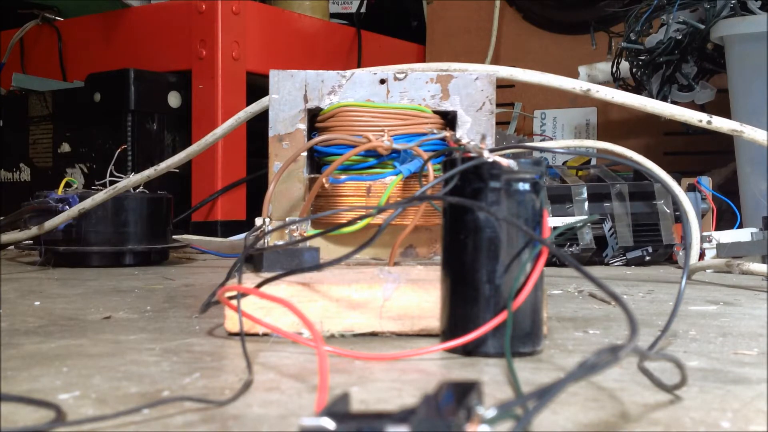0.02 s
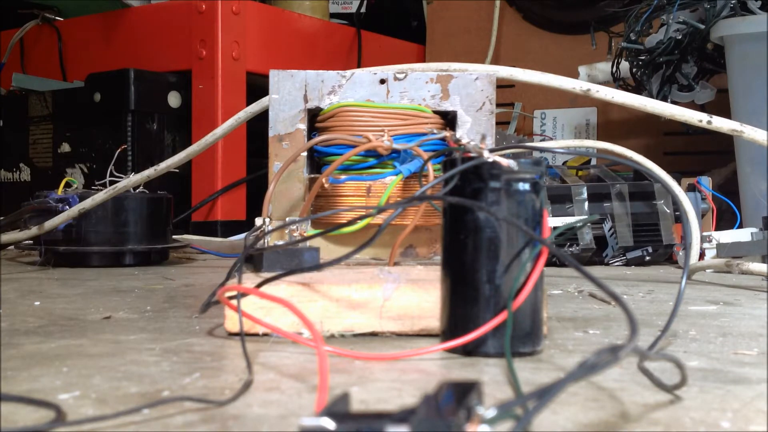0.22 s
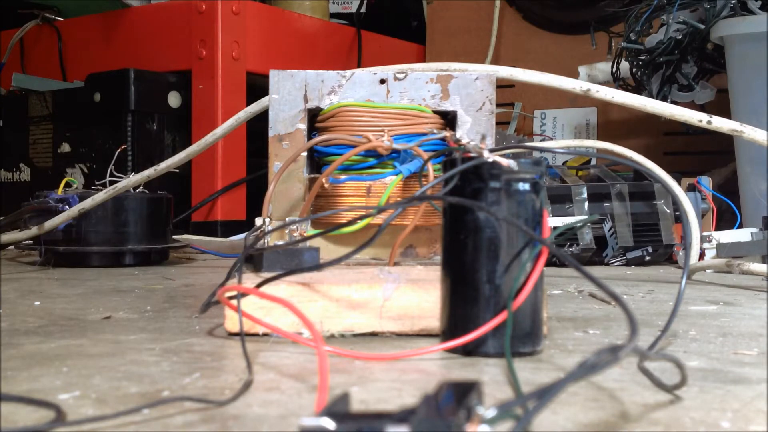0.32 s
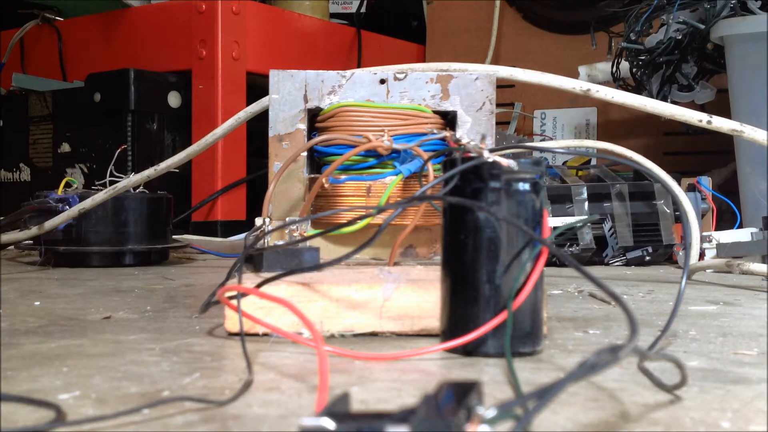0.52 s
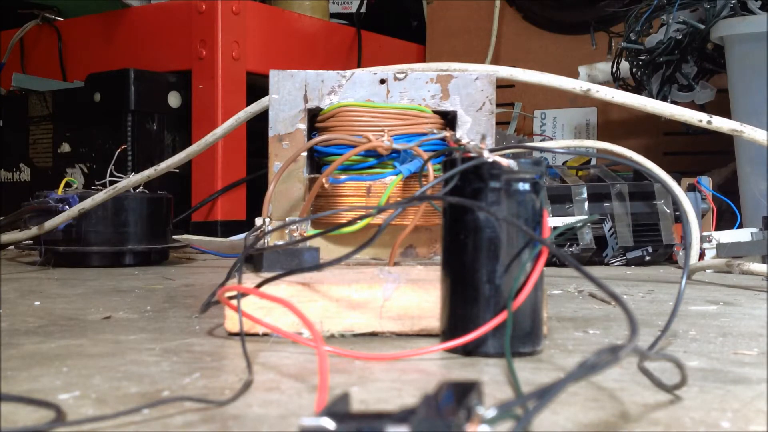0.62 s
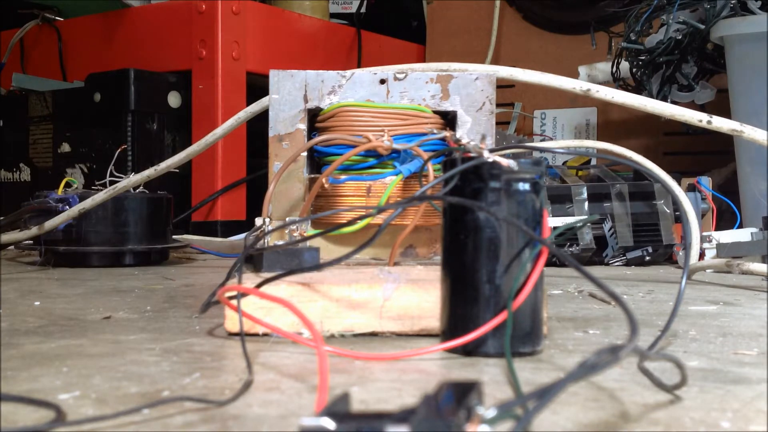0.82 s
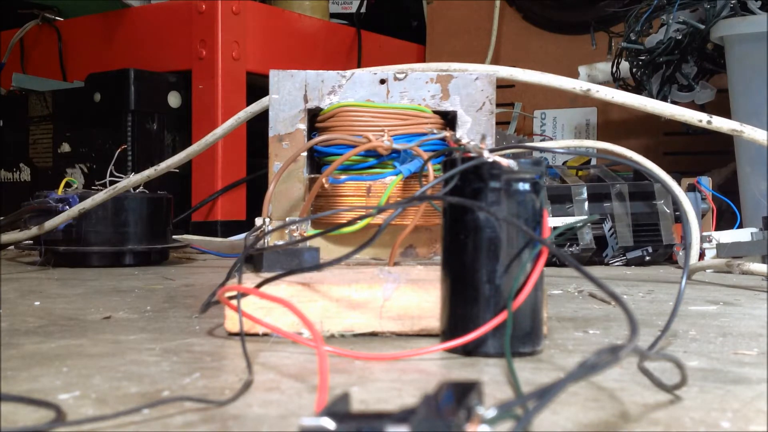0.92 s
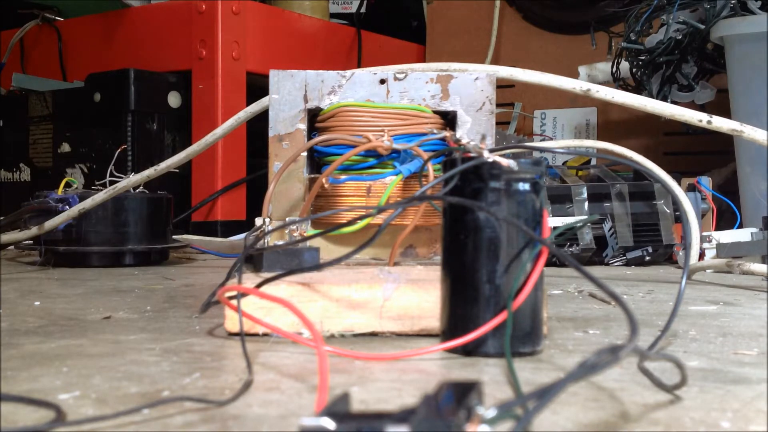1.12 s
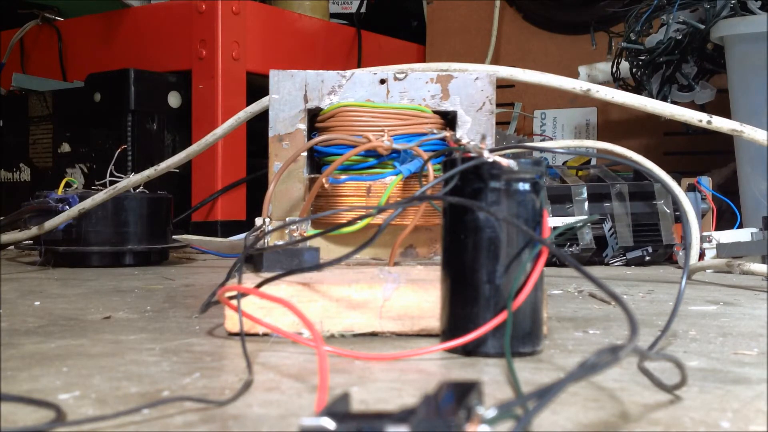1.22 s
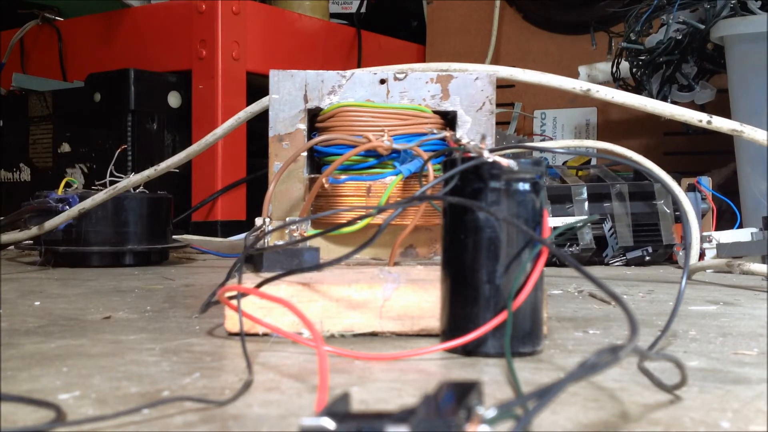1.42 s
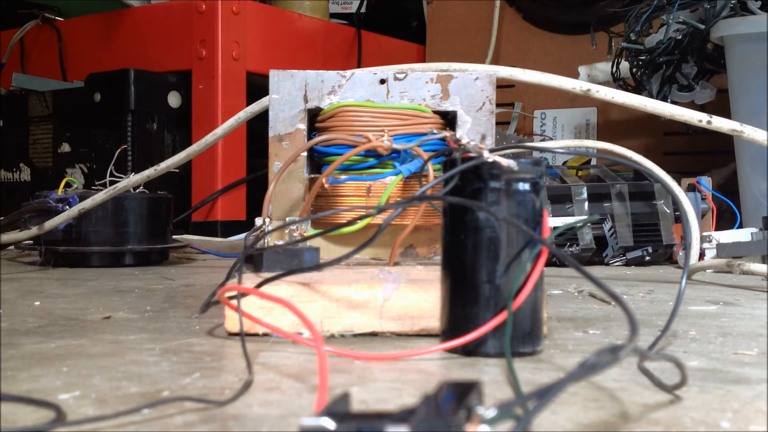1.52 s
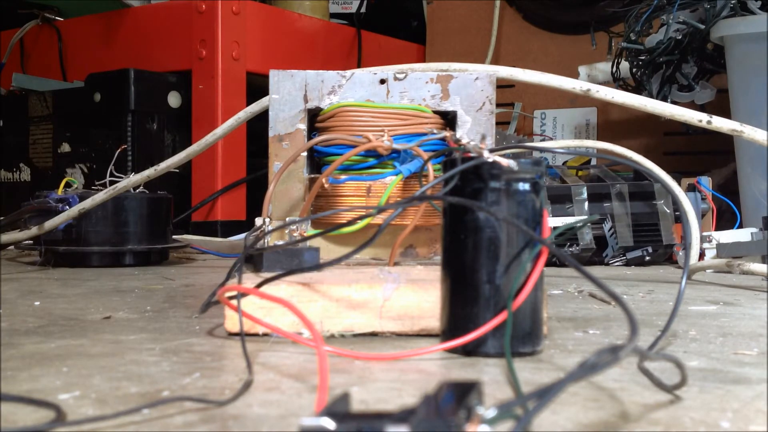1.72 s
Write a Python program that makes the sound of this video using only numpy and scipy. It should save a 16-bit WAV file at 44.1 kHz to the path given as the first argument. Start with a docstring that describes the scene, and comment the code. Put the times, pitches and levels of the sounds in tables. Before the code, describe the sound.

Electric sparks snap sharply in two ragged, crackling bursts over a very faint workshop hum

```python
"""High-voltage coil snapping in a workshop

A home-built coil snaps in two ragged bursts, each announced by faint ticks. Every discharge is a click that
rings broad resonances and leaves a short crackle; the room answers with a bright tail of dying noise.
Below: banded room noise, a wavering hum and thin whine of resonated noise, and faint far sine whistles,
perhaps a bird."""
import sys
import numpy as np
from scipy import signal
from scipy.io import wavfile

SR = 44100
rng = np.random.default_rng(int(sys.argv[2]) if len(sys.argv) > 2 else 0)


def to_wav(s):
    """Save 16-bit WAV."""
    ch = np.atleast_2d(s).T  # columns
    pcm = np.round(np.clip(ch, -1, 1) * 32767)  # PCM
    wavfile.write(sys.argv[1], SR, pcm.astype(np.int16))


N = 77175


def amp(db):
    """Amplitude ratio of a level in dB."""
    return 10 ** (np.asarray(db) / 20)


def rms_one(x):
    """Scale to unit RMS."""
    return x / np.sqrt(np.mean(x ** 2) + 1e-20)


def resonance(x, hz, pole_width_hz):
    """Two-pole peak of about unit gain, applied twice for dark valleys."""
    r = np.exp(-np.pi * pole_width_hz / SR)
    numerator = [(1 - r * r) / 2, 0, (r * r - 1) / 2]
    denominator = [1, -2 * r * np.cos(2 * np.pi * hz / SR), r * r]
    stage = numerator + denominator
    return signal.sosfilt([stage, stage], x + 1e-18)


def bandpass(x, low_hz, high_hz):
    """Butterworth band."""
    return signal.sosfilt(signal.butter(2, [low_hz, high_hz], "band", fs=SR, output="sos"), x)


def drift(pole_hz):
    """Slow random wander: noise through two equal low-pass poles, unit RMS."""
    r = np.exp(-2 * np.pi * pole_hz / SR)
    noise = rng.standard_normal(N + SR)
    settled = signal.lfilter([1], [1, -2 * r, r * r], noise)[SR:]
    return rms_one(settled)


# room noise spectrum: f/Hz, relative density/dB per Hz
NOISE_SPECTRUM = [(18, -72), (30, -43), (101, -22), (195, 0), (339, -18), (387, -7.5), (655, -11.5),
                  (1690, -17), (2390, -21.5), (3640, -23), (9900, -29.5), (14700, -26.5), (16300, -43)]
# room noise RMS: t/s, level/dB
NOISE_LEVEL = [(0, -70), (.035, -71.5), (0.199, -67.5), (.45, -72.5), (0.749, -68), (1.019, -72.5),
               (1.3, -70), (1.75, -67)]
# wavering tones: f/Hz, pole width/Hz, mean level/dB
HUM_TONES = [(195.3, 8.6, -78), (395, 44, -83.5), (1628, 25, -87)]
FLICKER_DB = 1


def background():
    """Half-octave noise bands, each flickering a little, plus hum and whine as narrowly resonated noise."""
    edges_hz = 30 * 2 ** np.arange(0, 9.6, .5)
    spectrum_hz, spectrum_db = np.transpose(NOISE_SPECTRUM)
    white = rng.standard_normal((2, N))  # neighbouring bands use different noise
    shared_drift = drift(6)
    noise = 0
    for k, (low, high) in enumerate(zip(edges_hz, edges_hz[1:])):
        band_db = np.interp(np.log(low * high) / 2, np.log(spectrum_hz), spectrum_db)
        flicker_db = FLICKER_DB * (0.2 * shared_drift + drift(4.3))
        noise = noise + bandpass(white[k % 2], low, high) * amp(band_db + flicker_db)
    t, level_db = np.transpose(NOISE_LEVEL)
    level_db = np.interp(np.arange(N) / SR, t, level_db)
    hum = sum(amp(db) * rms_one(resonance(rng.standard_normal(N), hz, width))
              for hz, width, db in HUM_TONES)
    return amp(level_db) * rms_one(noise) + amp(level_db - level_db.mean()) * hum


STRENGTH_SPREAD_DB = 2.5  # standard deviation, click to click
CLICK_LEAD_S = 0.0002  # clicks start this much before the listed times


def discharge_rings(at, level_db, polarity, group, crackle_db, crackle_t60_s):
    """Each click and its decaying noise crackle excite a group of resonances."""
    luck = rng.standard_normal((len(at), 5))
    clicks, out = np.zeros(N), np.zeros(N)
    for k, (hz, width, ring_db) in enumerate(group):
        clicks[at] = amp(level_db + ring_db + STRENGTH_SPREAD_DB * luck[:, k])
        glow = signal.lfilter([1], [1, -amp(-60 / crackle_t60_s / SR)], clicks)
        crackle = amp(crackle_db) * glow * rng.standard_normal(N)
        clicks[at] *= polarity
        out += resonance(clicks + crackle, hz, width)
    return out


def dying_noise(t60_s):
    """Half a second of noise falling 60 dB per t60."""
    t = np.arange(SR // 2) / SR
    return rng.standard_normal(len(t)) * amp(-60 * t / t60_s)


ROOM_RISE_S = 0.0013  # time constant


def room_answer(clicks, low_hz, high_hz, near_db, near_t60_s, far_db, far_t60_s):
    """Clicks convolved with band-limited noise that rises fast and dies at two rates."""
    rise = 1 - np.exp(-np.arange(SR // 2) / SR / ROOM_RISE_S)
    tail = rise * (amp(near_db) * dying_noise(near_t60_s) + amp(far_db) * dying_noise(far_t60_s))
    return signal.fftconvolve(clicks, bandpass(tail, low_hz, high_hz))[:N]


def discharge(t, level_db, polarity, group, crackle, room):
    """One resonance group over all its discharges: rings, crackle and room answer."""
    group_db, crackle_db, crackle_t60_s = crackle
    at = ((t - CLICK_LEAD_S) * SR).astype(int)
    impulse = np.eye(1, 2048)[0]
    response = sum(amp(db) * resonance(impulse, hz, width) for hz, width, db in group)
    scale = amp(group_db) / np.abs(response).max()  # so listed levels are nominal ring peaks
    rings = discharge_rings(at, level_db, polarity, group, crackle_db, crackle_t60_s)
    clicks = np.zeros(N)
    clicks[at] = amp(level_db) * polarity
    return scale * (rings + room_answer(clicks, *room))


# discharges: t/s, then nominal peak level/dB of sizzle, snap, knock
SPARK_CLICKS = [(0.1536, -50, -56, -58), (0.1781, -64, -60, -59), (0.1922, -61, -66, -64),
                (0.2193, -23, -29, -45), (0.2214, -12, -18, -34), (0.2219, -17, -29, -41),
                (0.2226, -10, -35, -43), (0.2256, -23, -33, -23), (0.2266, -27, -19, -30),
                (0.2281, -19, -20, -39), (0.2299, -20, -29, -40), (0.2312, -30, -26, -43),
                (0.2341, -17, -28, -46), (0.2358, -1, -10, -28), (0.2366, -5, -22, -33),
                (0.2371, -7, -24, -37), (0.2387, -14, -22, -49), (0.2393, -17, -30, -37),
                (0.3176, -23, -26, -42), (0.3189, -9, -17, -31), (0.3197, -24, -27, -41),
                (0.3204, -19, -31, -42), (0.3225, -18, -29, -48), (0.3312, -44, -44, -52),
                (0.7128, -49, -55, -56), (0.7395, -70, -58, -57), (0.7965, -22, -38, -36),
                (0.7973, -29, -27, -15), (0.8024, -29, -22, -22), (0.8041, -14, -26, -32),
                (0.8076, -31, -24, -34), (0.8127, -25, -31, -37), (0.8149, -23, -28, -44),
                (0.8158, -6, -12, -35), (0.8167, -5, -18, -27), (0.8179, -11, -27, -35),
                (0.8196, -14, -25, -38), (0.8234, -27, -32, -39), (0.8301, -24, -19, -35),
                (0.8307, -10, -30, -43), (0.8334, -19, -32, -47), (0.8356, -6, -14, -39),
                (0.8361, -7, -14, -31), (0.837, -10, -29, -41), (0.8388, -19, -29, -51),
                (0.8739, -5, -19, -39), (0.8754, -21, -25, -45), (0.8778, -28, -32, -52),
                (0.8915, -34, -35, -49), (0.8922, -28, -23, -39), (0.8932, -11, -29, -43),
                (0.8951, -14, -22, -50), (0.8966, -14, -29, -40), (0.9017, -31, -49, -51),
                (1.047, -66, -65, -68)]
# discharges that also push the air: t/s, then nominal peak level/dB of ting, clack, pop, thump
AIR_PUSHES = [(.1536, -70, -53, -68, -75), (.1922, -57, -66, -75, -75), (.2255, -36, -36, -22, -36),
              (.2358, -27, -35, -30, -33), (.3187, -42, -44, -56, -58), (.7128, -70, -54, -64, -75),
              (.7395, -72, -61, -66, -75), (.7970, -40, -19, -27, -52), (.8005, -45, -33, -44, -60),
              (.8027, -40, -39, -40, -59), (.8164, -33, -40, -29, -31), (.8359, -40, -35, -36, -39),
              (.8736, -40, -39, -36, -47), (.8922, -42, -53, -50, -65), (1.048, -75, -66, -80, -80)]
# start sign of ting, clack, pop, thump
PUSH_SIGNS = (1, -1, 1, -1)
# resonances of each group: f/Hz, pole width/Hz, relative level/dB
SIZZLE_RINGS = [(11120, 1100, -5), (12405, 1700, -1.5), (14230, 1900, -3.5)]
SNAP_RINGS = [(5200, 2300, -16.5), (7100, 1600, 0), (7890, 690, -1.5)]
KNOCK_RINGS = [(2300, 900, -14), (3500, 450, 0), (3550, 1500, -6)]
TING_RINGS = [(5400, 900, 0)]
CLACK_RINGS = [(2250, 900, 0)]
POP_RINGS = [(980, 1300, 0)]
THUMP_RINGS = [(221, 520, -1.5)]
# crackle, one row per group in the order above: group level/dB, crackle level/dB, t60/s
CRACKLES = [(0, -27, .011), (0, -26, .014), (0, -30, .016), (0, -30, .012), (0, -31, .016), (0, -34, .02),
            (0, -36, .02)]
# room answer, same rows: low f/Hz, high f/Hz, near level/dB, near t60/s, far level/dB, far t60/s
ROOM_TAILS = [(10870, 14600, -43.5, 0.07, -54.5, 0.21), (6000, 8600, -40.5, 0.044, -56.5, 0.38),
              (2700, 8700, -39.5, 0.067, -53, 0.4), (4500, 6000, -45.5, 0.037, -53, 0.28),
              (1700, 2800, -43, 0.098, -49, .4), (700, 1800, -43.5, 0.042, -46, .3),
              (250, 430, -52, 0.03, -62.5, .3)]


def sparks():
    """Sparks click with random sign; in a push, neighbouring groups start in opposite directions."""
    spark_t, *spark_levels = np.transpose(SPARK_CLICKS)
    push_t, *push_levels = np.transpose(AIR_PUSHES)
    random_sign = rng.choice([-1, 1], len(spark_t))
    parts = [(spark_t, db, random_sign) for db in spark_levels]
    parts += [(push_t, db, sign) for db, sign in zip(push_levels, PUSH_SIGNS)]
    groups = (SIZZLE_RINGS, SNAP_RINGS, KNOCK_RINGS, TING_RINGS, CLACK_RINGS, POP_RINGS, THUMP_RINGS)
    return sum(discharge(*part, group, crackle, room)
               for part, group, crackle, room in zip(parts, groups, CRACKLES, ROOM_TAILS))


# far whistles: start t/s, length/s, mean f/Hz, nominal peak level/dB
FAR_WHISTLES = [(1.04, .045, 3600, -83), (1.052, .02, 2300, -73), (1.1, .05, 3630, -82),
                (1.16, .125, 3640, -81), (1.28, .05, 3650, -84)]
WAVER_RMS_HZ, FLUTTER_RMS_DB = 15, 4


def whistles():
    """Soft sines that swell and fade, wavering in pitch and fluttering in level."""
    t = np.arange(N) / SR
    waver_hz = WAVER_RMS_HZ * drift(33)
    flutter = amp(FLUTTER_RMS_DB * drift(41))
    out = np.zeros(N)
    for start, length, hz, db in FAR_WHISTLES:
        swell = np.sin(np.pi * np.clip((t - start) / length, 0, 1))
        phase = 2 * np.pi * np.cumsum(hz + waver_hz) / SR
        out += amp(db) * swell * np.sin(phase)
    return flutter * out


def scene():
    """Sum of all sources, one channel."""
    return (sparks() + background() + whistles())[None]


OVERLOAD = 0.81  # soft-clip ceiling, full scale = 1
STEP_STOPBAND_HZ, STEP_DB = 15410, -19
CUTOFF_STOPBAND_HZ = 16650


def record(dry):
    """Peaks are rounded, deep bass is lost; the top steps down, then is cut."""
    rounded = OVERLOAD * np.tanh(dry / OVERLOAD)
    thinned = signal.sosfilt(signal.butter(1, 30, "high", fs=SR, output="sos"), rounded)
    step = signal.cheby2(16, 30, STEP_STOPBAND_HZ, fs=SR, output="sos")
    low = signal.sosfiltfilt(step, thinned)
    stepped = low + amp(STEP_DB) * (thinned - low)
    cutoff = signal.cheby2(18, 25, CUTOFF_STOPBAND_HZ, fs=SR, output="sos")
    return signal.sosfiltfilt(cutoff, stepped)


dry = scene()
out = record(dry)
to_wav(out)
```